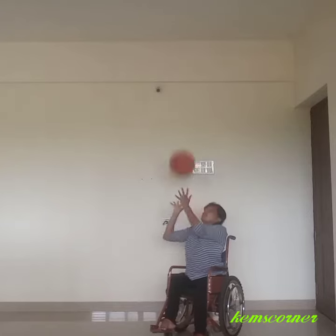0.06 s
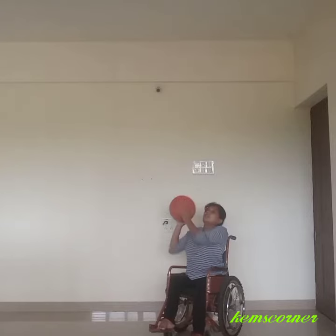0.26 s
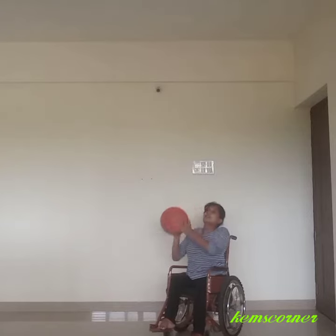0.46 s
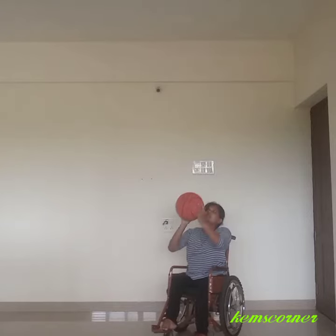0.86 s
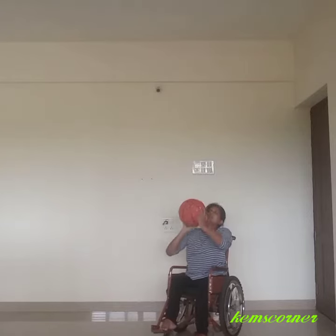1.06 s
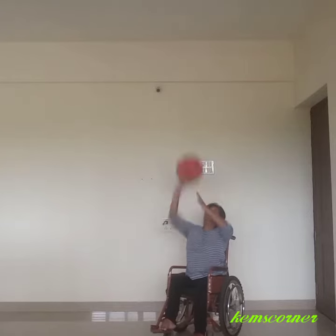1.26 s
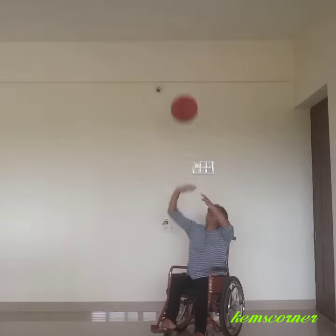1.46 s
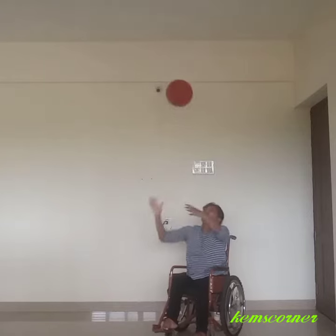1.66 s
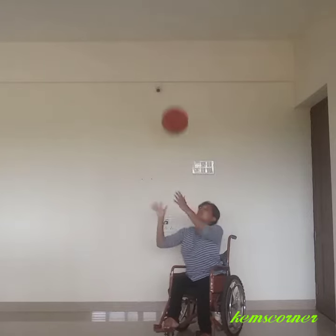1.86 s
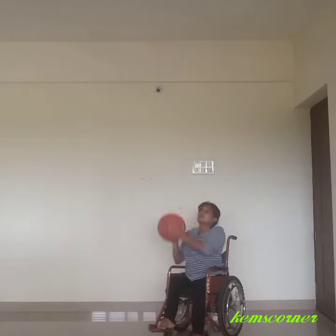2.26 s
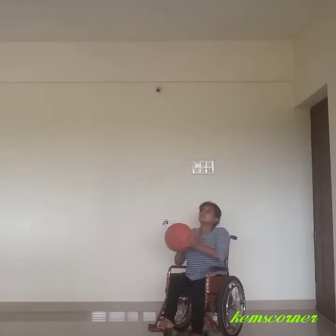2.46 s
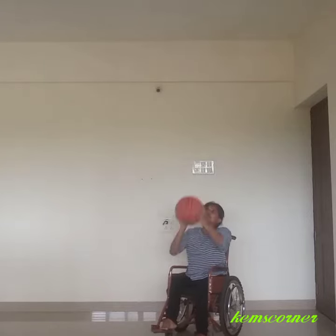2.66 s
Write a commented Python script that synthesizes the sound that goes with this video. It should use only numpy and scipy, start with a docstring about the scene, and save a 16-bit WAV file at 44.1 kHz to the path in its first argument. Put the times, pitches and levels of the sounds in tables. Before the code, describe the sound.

A basketball is caught twice with loud, hollow thumps in a bare, echoing room.

```python
"""Fingers patter on a basketball, palms thump it hollowly and its shell rings; a bare, hard room booms on. A
person in a wheelchair has caught the ball, then tosses it up with a soft push and catches it again. Between the
catches sleeves rustle and the chair creaks and zings faintly, over a distant outdoor hum. A noise suppressor
turns down the faintest sound."""
import sys
import numpy as np
from scipy import signal
from scipy.fft import rfft, irfft, next_fast_len
from scipy.io import wavfile
from scipy.ndimage import uniform_filter1d

SR = 44100
rng = np.random.default_rng(int(sys.argv[2]) if len(sys.argv) > 2 else 0)


def wav_out(sig):
    """Save sig, one row per channel (or a flat mono array), as 16-bit PCM at SR to the path in sys.argv[1]."""
    wavfile.write(sys.argv[1], SR, np.round(np.clip(np.atleast_2d(sig).T, -1, 1) * 32767).astype(np.int16))


N = 119070
TIME_S = np.arange(N) / SR
FFT_SIZE = next_fast_len(2 * N)
FREQS_HZ = np.maximum(np.arange(FFT_SIZE // 2 + 1) * SR / FFT_SIZE, 1)


def from_db(db):
    """Decibels to gain."""
    return 10 ** (np.asarray(db) / 20)


def at_hz(points, hz):
    """Table lookup on a log-frequency axis."""
    knots_hz, values = np.transpose(points)
    return np.interp(np.log(hz), np.log(knots_hz), values)


def tilted(spectrum, db_per_octave, pivot_hz=3000):
    """Spectrum brightened or dulled about a pivot."""
    return [(hz, db + db_per_octave * np.log2(hz / pivot_hz)) for hz, db in spectrum]


def fade(t60_s):
    """Exponential decay."""
    return np.exp(-np.log(1000) * TIME_S / t60_s)


def delayed(x, start_s):
    """Sound placed at its start time."""
    return np.concatenate([np.zeros(max(int(start_s * SR), 0)), x])[:N]


def through(x, response):
    """Convolution with an impulse response."""
    return signal.fftconvolve(x, response)[:N]


def pulse(spectrum):
    """Minimum-phase pulse with this spectrum."""
    cepstrum = irfft(np.log(from_db(at_hz(spectrum, FREQS_HZ))), FFT_SIZE)
    folded = np.concatenate([cepstrum[:1], 2 * cepstrum[1:FFT_SIZE // 2]])
    return irfft(np.exp(rfft(folded, FFT_SIZE)), FFT_SIZE)[:N]


def ring(modes):
    """Struck modes decaying, neighbours in opposite sign."""
    return sum((-1) ** k * from_db(db) * np.sin(2 * np.pi * hz * TIME_S) * fade(t60_s)
               for k, (hz, db, t60_s) in enumerate(modes))


def stroke(length_s, attack_s=0.0019, release_s=0.021):
    """Envelope of a rubbing contact."""
    attack = 1 - np.exp(-TIME_S / attack_s)
    return attack * np.exp(-np.maximum(TIME_S - length_s, 0) / release_s)


def wobble(rate_hz):
    """Smooth random signal, spread about 1."""
    return np.interp(TIME_S * rate_hz, np.arange(N), rng.standard_normal(N))


# outdoor hum spectrum: (frequency [Hz], level [dB])
HUM_SPECTRUM = [(25, -84), (70, -52.5), (130, -44.5), (220, -50), (330, -39), (600, -44), (900, -65.5),
                (1300, -67), (1700, -78), (2600, -70), (6000, -72.5), (15500, -85)]
def outdoor_hum():
    """Steady, low noise from far outside."""
    white = rfft(rng.standard_normal(FFT_SIZE))
    return irfft(white * from_db(at_hz(HUM_SPECTRUM, FREQS_HZ)), FFT_SIZE)[:N]


# reverberation time: (frequency [Hz], T60 [s])
ROOM_DECAY = [(80, 2.46), (250, 1.76), (500, 1.98), (1000, 1.42), (2000, 1.386), (4000, 1.33),
              (6000, 1.075), (9000, 1.01), (15000, 0.95)]
def room(x, direct_db, tail_db=-34, early_db=-36, echoes_per_s=120):
    """Hard walls add scattered early echoes and a dense tail whose treble dies first."""
    white, tail = rfft(rng.standard_normal(N)), 0
    hz = np.arange(len(white)) * SR / N
    edges_hz = np.concatenate([[0], np.geomspace(100, SR / 2, 16)])
    for low, high in zip(edges_hz, edges_hz[1:]):
        band = irfft(white * ((hz >= low) & (hz < high)), N)
        envelope = np.sqrt(uniform_filter1d(band ** 2, size=3000) * SR / 2 / (high - low))
        tail += band / envelope * fade(at_hz(ROOM_DECAY, (low + high) / 2))
    arrivals = rng.random(N) < echoes_per_s / SR
    echoes = arrivals * rng.choice([-1, 1], N) * fade(t60_s=0.43)
    response = from_db(tail_db) * tail + from_db(early_db) * delayed(echoes, start_s=0.0085)
    return from_db(direct_db) * x + through(x, response)


# metal frame modes: (frequency [Hz], level [dB], width [Hz])
FRAME_MODES = [(3850, -1, 120), (6573, -3, 180), (7500, -13, 150), (9200, -5, 250), (10471, 3, 220),
               (14350, -9, 300)]
def frame_zing(start_s=1.585, level_db=-66):
    """The chair's metal frame rings once, briefly, in narrow noise bands."""
    zing = 0
    for hz, db, width_hz in FRAME_MODES:
        zing += from_db(level_db + db) * wobble(width_hz) * np.sin(2 * np.pi * hz * TIME_S)
    return delayed(zing * fade(t60_s=0.45), start_s)


# chair creaks: (start [s], length [s], from [Hz], to [Hz], level [dB])
CHAIR_CREAKS = [(0.877, .14, 4350, 4305, -81), (0.963, 0.136, 1723, 1670, -74.5),
                (1.201, 0.036, 770, 761, -65.5), (1.211, .05, 4550, 4430, -74),
                (1.502, 0.039, 347, 383, -59), (1.578, 0.0834, 246.2, 322.3, -55.5),
                (1.672, 0.12, 278.7, 244.5, -57.5), (1.725, 0.043, 1063, 1136, -59.5),
                (1.84, 0.149, 404.3, 416.7, -55)]
def chair_creaks(pitch_jitter=0.0268):
    """Shifting weight draws rough, gliding tones from the chair."""
    out = 0
    for start_s, length_s, from_hz, to_hz, db in CHAIR_CREAKS:
        glide_hz = np.interp(TIME_S, [0, length_s], [from_hz, to_hz])
        hz = glide_hz * (1 + pitch_jitter * wobble(rate_hz=100))
        grip = 1 + 0.48 * wobble(rate_hz=150.4)
        tone = np.sin(2 * np.pi * np.cumsum(hz) / SR)
        out += delayed(from_db(db) * grip * stroke(length_s) * tone, start_s)
    return room(out, direct_db=0.5)


# cloth strokes: (start [s], length [s], level [dB], tilt [dB/octave])
CLOTH_STROKES = [(0.0, 0.024, -57.5, 0), (1.204, 0.069, -59.5, -0.5), (1.272, 0.062, -57.5, 2),
                 (1.446, 0.012, -40, -1), (1.48, 0.11, -55, 0.5), (1.805, 0.018, -37.5, 1.5),
                 (1.838, 0.1, -51.5, -1.5)]
# cloth spectrum: (frequency [Hz], level [dB])
CLOTH_SPECTRUM = [(60, -21), (120, 2.5), (200, 9.5), (400, 6.5), (700, 7.5), (1100, -2), (1900, 3.5),
                  (3000, -0.5), (4500, -2), (5600, -5), (6500, -4), (7800, -18), (10000, -20), (15500, -34)]
def cloth_rustles():
    """Sleeves and seat rub in short, grainy strokes as the arms move."""
    out = 0
    for start_s, length_s, db, tilt in CLOTH_STROKES:
        grains = rng.standard_normal(N) * np.exp(wobble(rate_hz=850))
        rub = from_db(db) * grains / grains.std() * stroke(length_s)
        colour = pulse(tilted(CLOTH_SPECTRUM, tilt))
        out += delayed(through(rub, colour), start_s)
    return room(out, direct_db=-4.5)


# push spectrum: (frequency [Hz], level [dB])
PUSH_SPECTRUM = [(30, -21), (70, -11), (130, 0.5), (200, 10), (300, -8.5), (600, -30), (2000, -43)]
def toss(start_s=1.46, level_db=-33):
    """A soft, low push as the ball leaves the hands."""
    push = from_db(level_db) * rng.standard_normal(N) * stroke(length_s=0.055)
    return delayed(through(push, pulse(PUSH_SPECTRUM)), start_s)


# hollow notes: (start [s], rise [s], from [Hz], to [Hz], level [dB])
HOLLOW_NOTES = [(.208, 0.033, 294.4, 420, -21), (2.151, 0.072, 400, 425.4, -33)]
def hollow_swells(glide_s=0.0399):
    """Just after each thump a note rises in level and pitch, then dies."""
    out = 0
    for start_s, rise_s, from_hz, to_hz, db in HOLLOW_NOTES:
        hz = np.interp(TIME_S, [0, glide_s], [from_hz, to_hz])
        envelope = TIME_S / rise_s * np.exp((1 - (TIME_S / rise_s) ** 2) / 2)
        tone = np.sin(2 * np.pi * np.cumsum(hz) / SR)
        out += delayed(from_db(db) * envelope * tone, start_s)
    return out


# finger landings: (time [s], level [dB], tilt [dB/octave])
FINGER_HITS = [(0.1949, -7.5, -4.5), (0.1986, 3, .5), (0.2058, -28, -1), (0.2102, 0, 0.5), (2.126, -5, -3),
               (2.13, -4, 1), (2.133, 2, 0.5), (2.138, 2.5, 1)]
# slap spectrum: (frequency [Hz], level [dB])
SLAP_SPECTRUM = [(60, -16), (150, -21.5), (600, 4), (1100, 4.5), (1800, 2), (2500, -2.5), (3300, -4.5),
                 (4300, -3), (6600, -4), (7600, -15), (10000, -16.5), (15500, -31)]
def finger_slaps():
    """Each finger hits the rubber with a brief, broadband crack."""
    out = 0
    for start_s, db, tilt in FINGER_HITS:
        burst = rfft(rng.standard_normal(N) * fade(t60_s=0.03), FFT_SIZE)
        crack = irfft(burst / np.abs(burst), FFT_SIZE)[:N]  # whitened
        slap = through(crack / np.linalg.norm(crack), pulse(tilted(SLAP_SPECTRUM, tilt)))
        out += delayed(from_db(db) * room(slap, direct_db=-4.5), start_s)
    return out


# palm impacts: (time [s], thump [dB], pitch [Hz], ball ring [dB], standing waves [dB], boom [dB])
PALM_HITS = [(0.203, 29, 357, -31.5, -37, -51), (2.128, 26, 433, -32.5, -44, -43)]
# thump spectrum: (frequency / pitch [ratio], level [dB])
THUMP_SPECTRUM = [(.1, -57), (.25, -35), (.36, -7), (.6, -8), (.74, -7), (.87, 0), (1.1, -0.5),
                  (1.35, -10.5), (1.8, -9), (2.3, -11.5), (4, -27), (10, -53)]
# shell modes of the ball: (frequency [Hz], level [dB], T60 [s])
BALL_MODES = [(990, -10.5, 0.075), (1077.4, 2, 0.16), (1133, -12.5, .1), (1312, -3, 0.12),
              (1396, -4.5, 0.059), (1790, -11, 0.076), (1880, -27, .1)]
# standing waves of the room: (frequency [Hz], level [dB], T60 [s])
ROOM_MODES = [(131, -1.5, 2.07), (135.2, -17, 0.53), (193, 1.5, 1.95), (228.7, -1.5, 2.1),
              (295, -4.5, 3.86), (404.2, 7, 2.01), (432, 2.5, 1), (554.3, 6, 1.46), (604, -7, 2.6),
              (644, -10, 3.2)]
# deepest standing waves, a beating pair: (frequency [Hz], level [dB], T60 [s])
BOOM_MODES = [(69.0, 0, 2.6), (76.0, -2, 2.4)]
def catches(build_s=0.005):
    """Palms stop the ball, its shell rings, and the room's standing waves build up and die."""
    out, build = 0, 1 - np.exp(-TIME_S / build_s)
    for start_s, thump_db, pitch_hz, ring_db, standing_db, boom_db in PALM_HITS:
        thump = pulse([(ratio * pitch_hz, db) for ratio, db in THUMP_SPECTRUM])
        ball = from_db(thump_db) * thump + from_db(ring_db) * ring(BALL_MODES)
        waves = from_db(standing_db) * ring(ROOM_MODES) + from_db(boom_db) * ring(BOOM_MODES)
        out += delayed(room(ball, direct_db=-8.5) + build * waves, start_s)
    return out


def scene():
    """Mono mix of hum, ball, clothes and chair."""
    hum = outdoor_hum()
    ball = catches() + hollow_swells() + finger_slaps() + toss()
    return (hum + ball + cloth_rustles() + chair_creaks() + frame_zing())[None]


# suppressor threshold: (frequency [Hz], level [dB])
NOISE_THRESHOLD = [(80, -58), (400, -40), (900, -52), (1500, -72.5), (2500, -57), (5000, -65.5),
                   (8000, -73.5), (15000, -87)]
def noise_suppressor(x, depth_db=-8.5, size=1024):
    """Each band is turned down as its smoothed power sinks towards the threshold."""
    framing = dict(fs=SR, nperseg=size, noverlap=size - size // 4)
    hz, _, spectra = signal.stft(x, **framing)
    power = uniform_filter1d(np.abs(spectra) ** 2, size=5, axis=-1)  # over time
    power = uniform_filter1d(power, size=3, axis=-2) * size / 1.5  # over frequency
    threshold = from_db(at_hz(NOISE_THRESHOLD, np.maximum(hz, 1)))[:, None] ** 2
    gain = np.maximum(power / (power + threshold), from_db(depth_db))
    return signal.istft(spectra * gain, **framing)[1][..., :N]


def record(dry):
    """Microphone bass roll-off, noise suppression, steep treble cut."""
    low_cut_hz, high_cut_hz = 23, 15800
    highpass = signal.butter(2, low_cut_hz, "high", fs=SR, output="sos")
    lowpass = signal.ellip(12, 0.1, 80, high_cut_hz, fs=SR, output="sos")
    suppressed = noise_suppressor(signal.sosfilt(highpass, dry))
    return signal.sosfilt(lowpass, suppressed)


dry = scene()
out = record(dry)
wav_out(out)
```